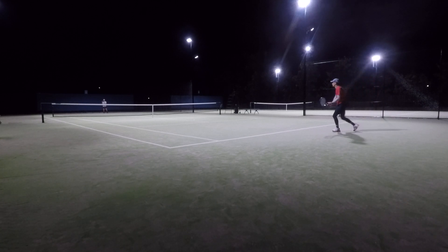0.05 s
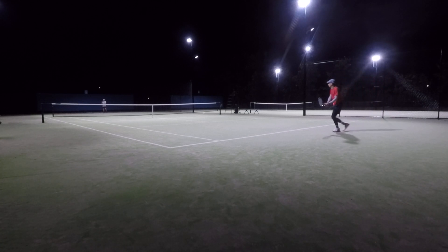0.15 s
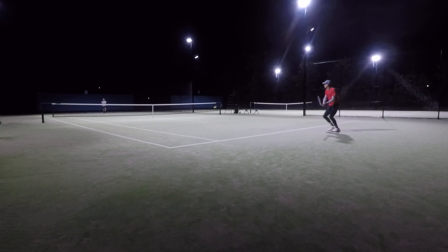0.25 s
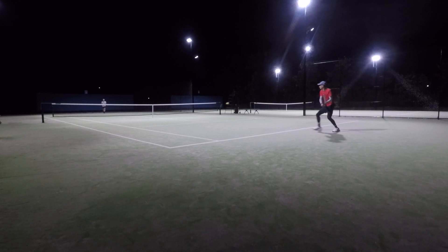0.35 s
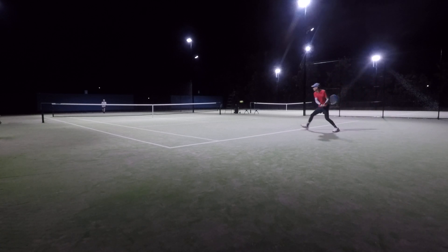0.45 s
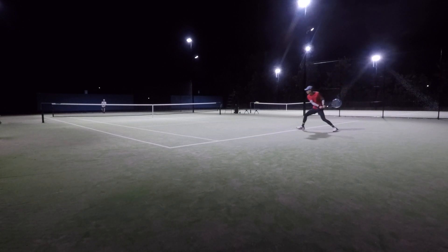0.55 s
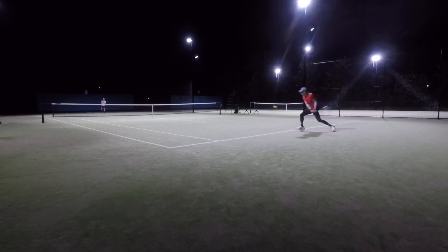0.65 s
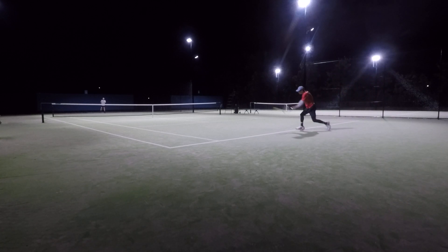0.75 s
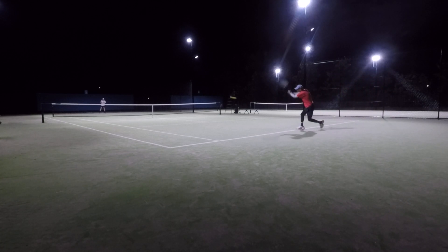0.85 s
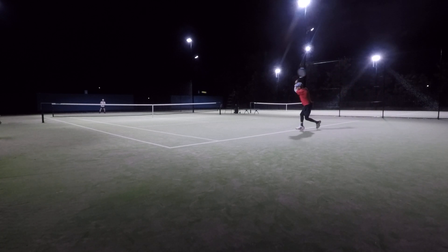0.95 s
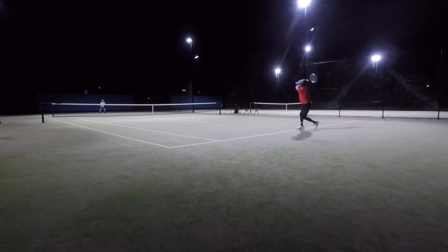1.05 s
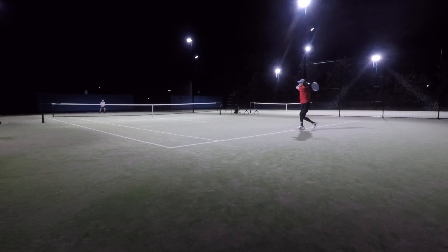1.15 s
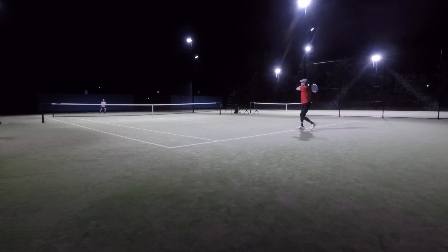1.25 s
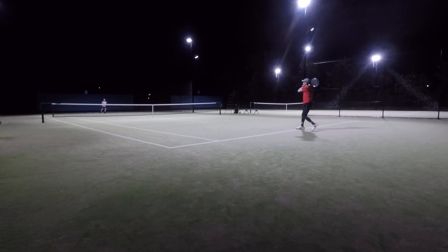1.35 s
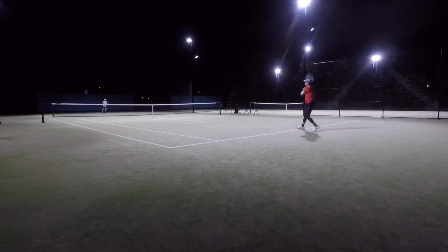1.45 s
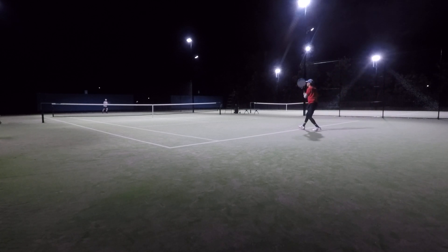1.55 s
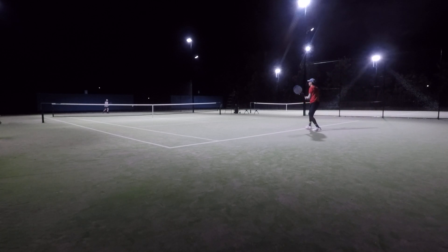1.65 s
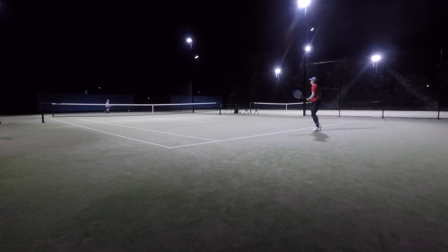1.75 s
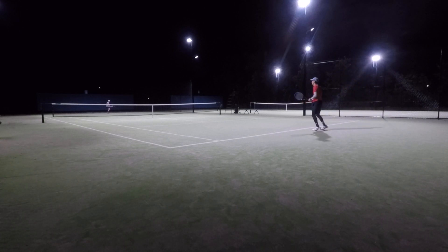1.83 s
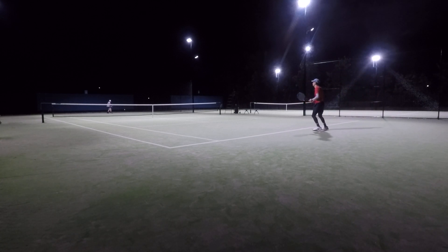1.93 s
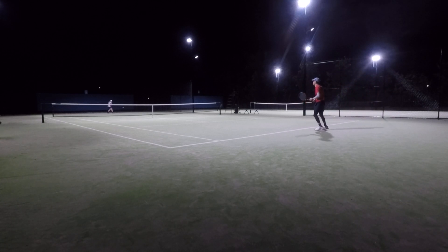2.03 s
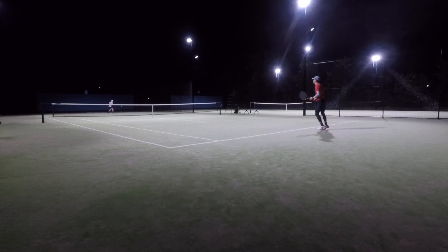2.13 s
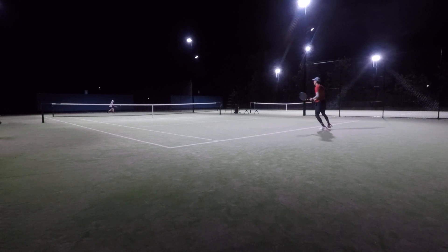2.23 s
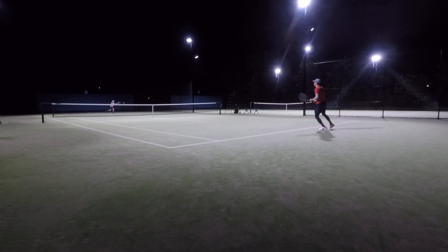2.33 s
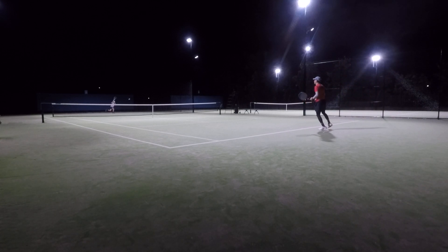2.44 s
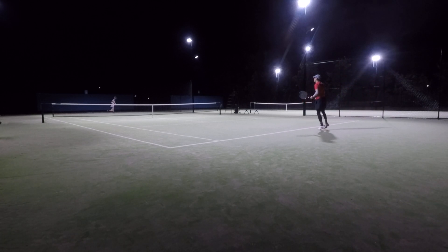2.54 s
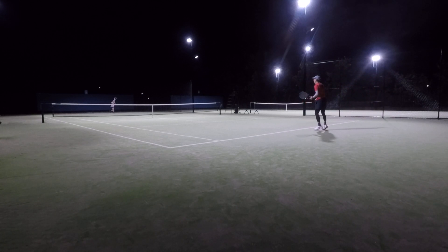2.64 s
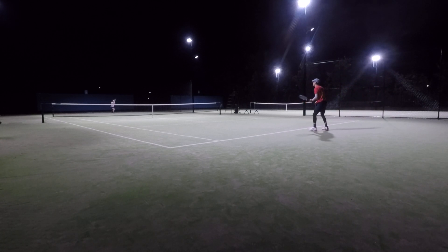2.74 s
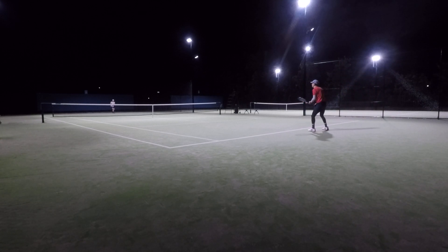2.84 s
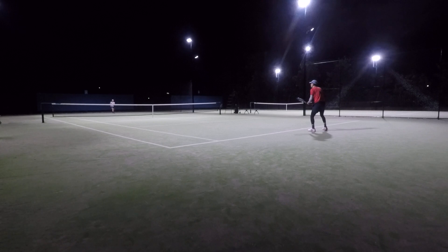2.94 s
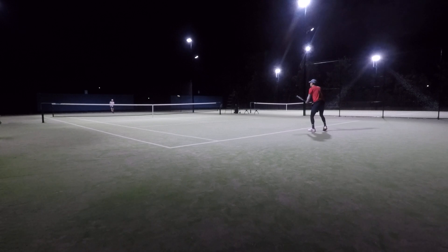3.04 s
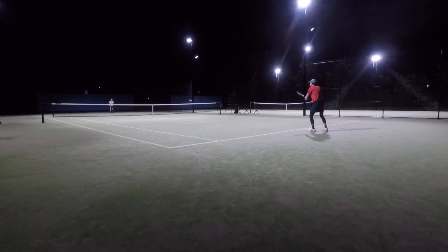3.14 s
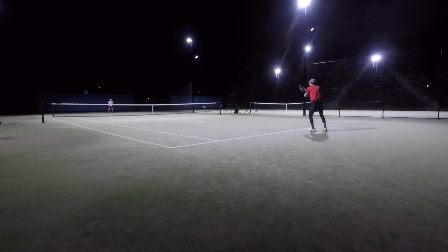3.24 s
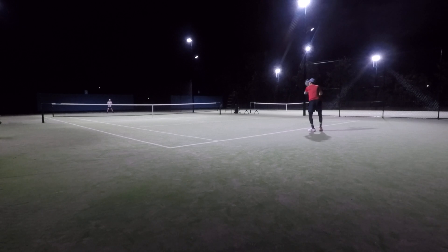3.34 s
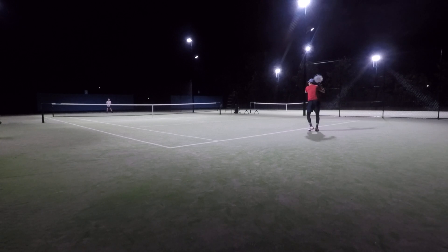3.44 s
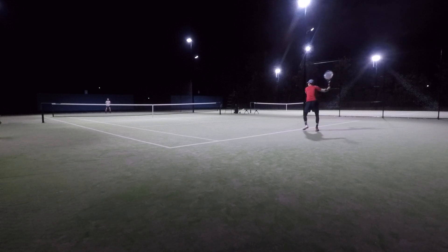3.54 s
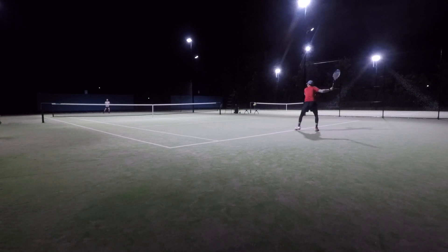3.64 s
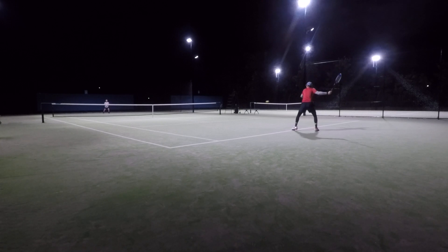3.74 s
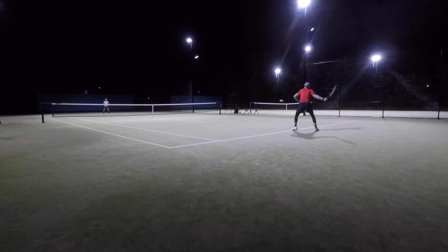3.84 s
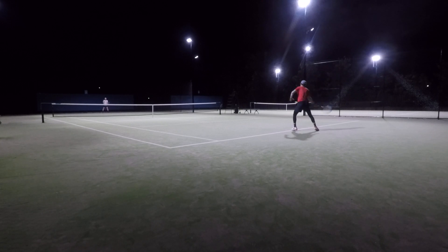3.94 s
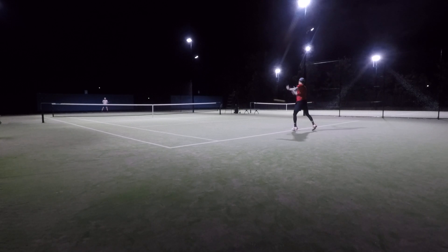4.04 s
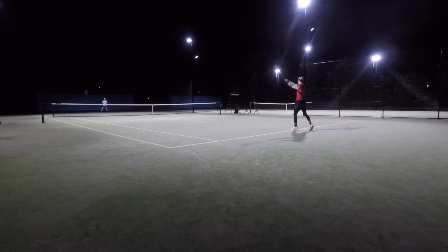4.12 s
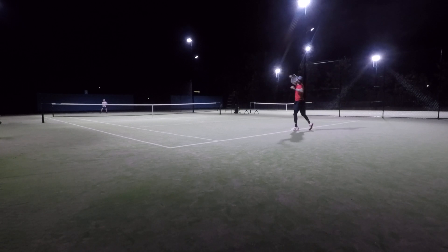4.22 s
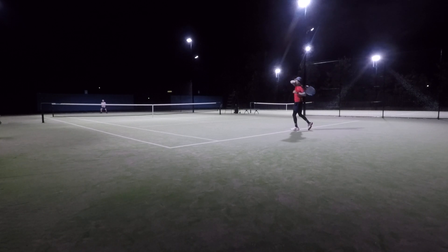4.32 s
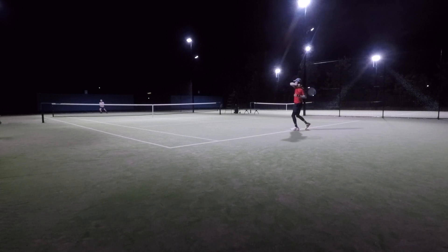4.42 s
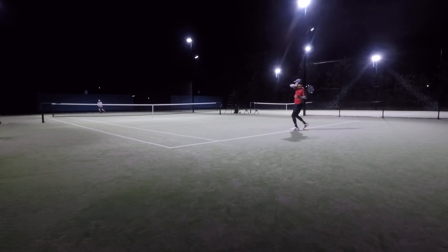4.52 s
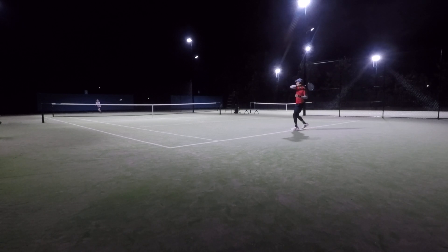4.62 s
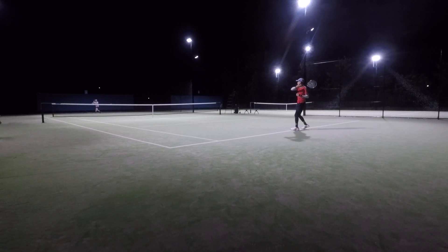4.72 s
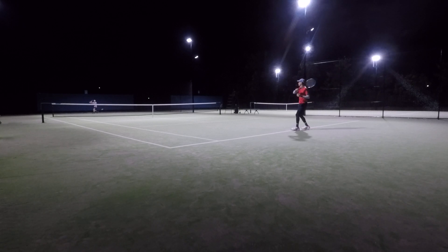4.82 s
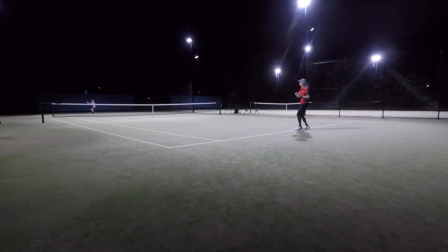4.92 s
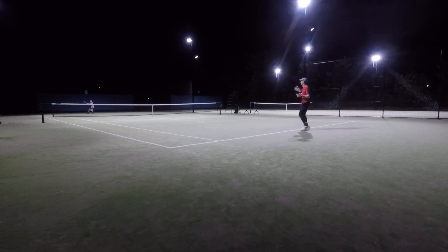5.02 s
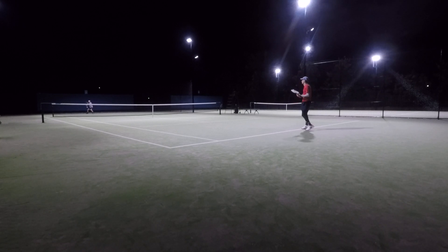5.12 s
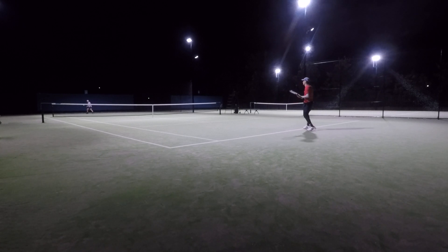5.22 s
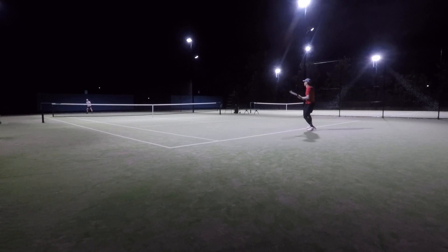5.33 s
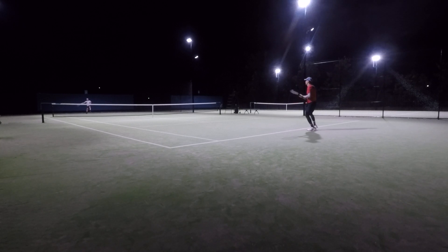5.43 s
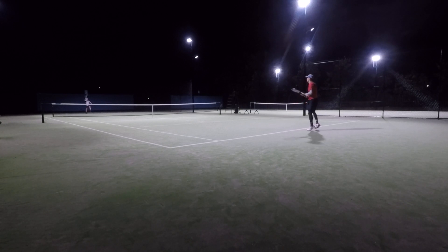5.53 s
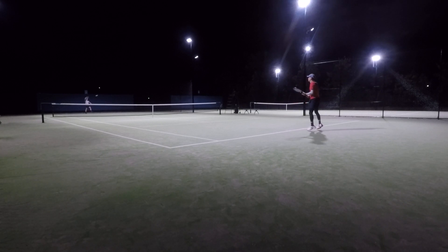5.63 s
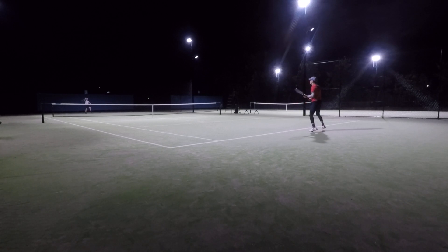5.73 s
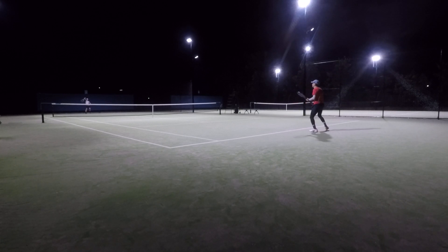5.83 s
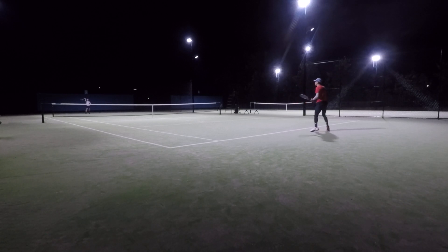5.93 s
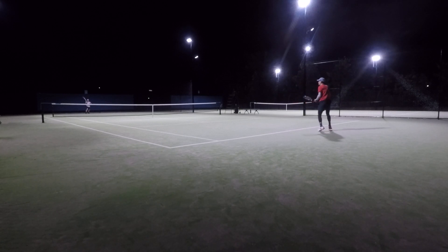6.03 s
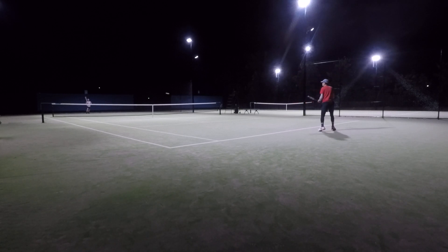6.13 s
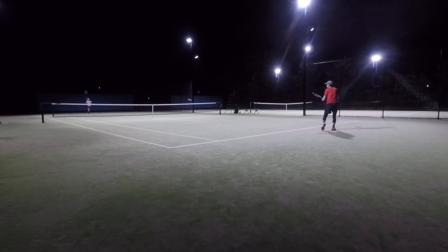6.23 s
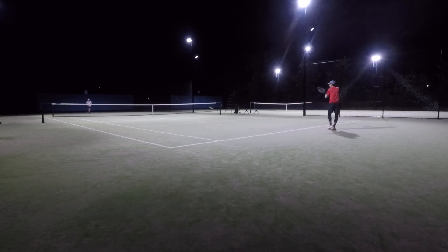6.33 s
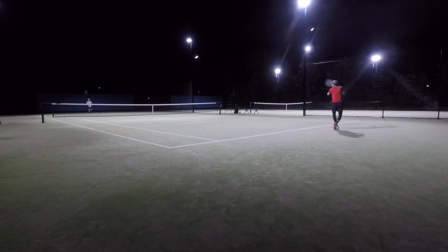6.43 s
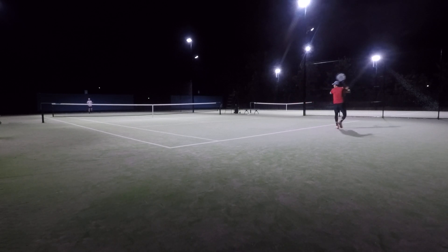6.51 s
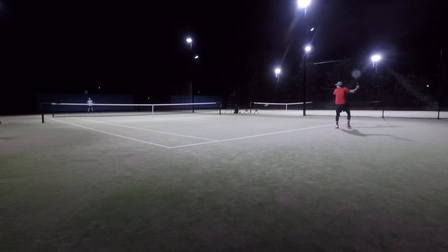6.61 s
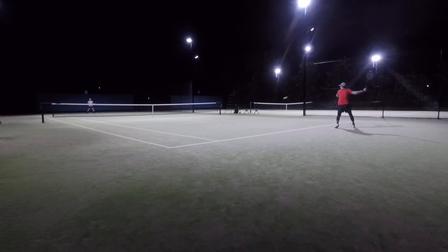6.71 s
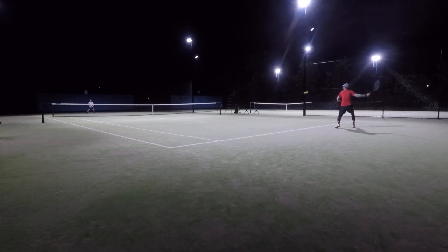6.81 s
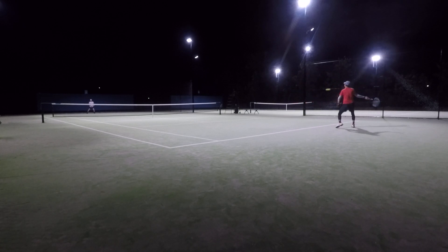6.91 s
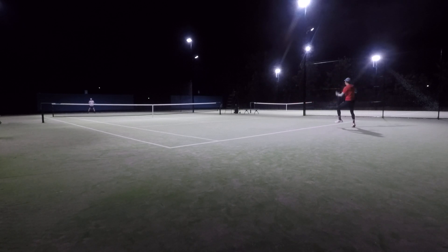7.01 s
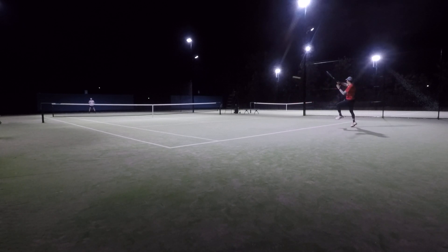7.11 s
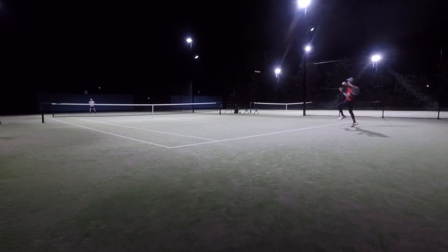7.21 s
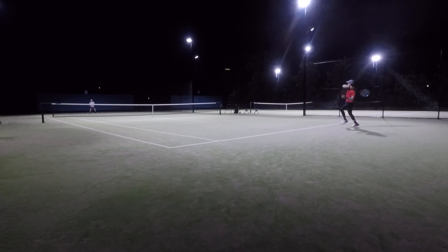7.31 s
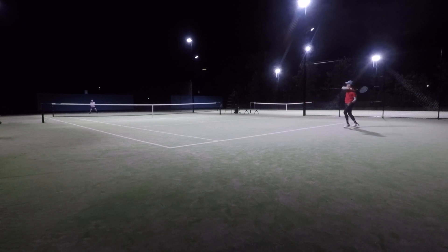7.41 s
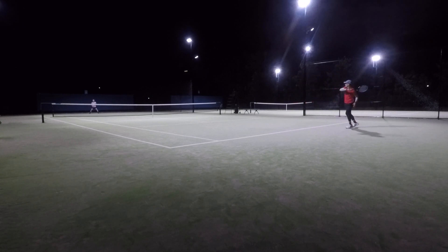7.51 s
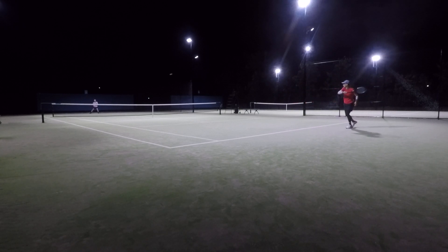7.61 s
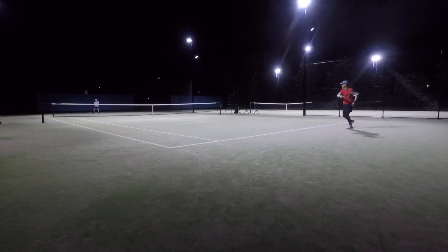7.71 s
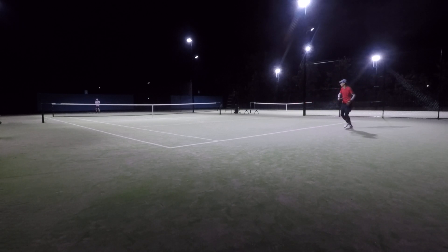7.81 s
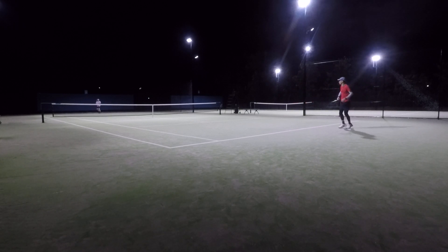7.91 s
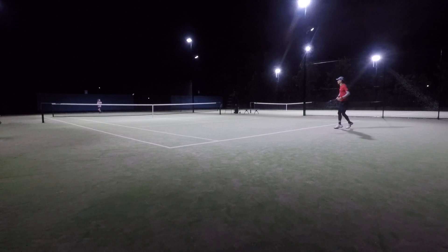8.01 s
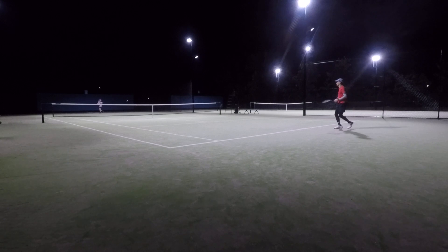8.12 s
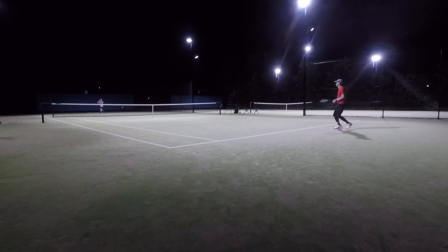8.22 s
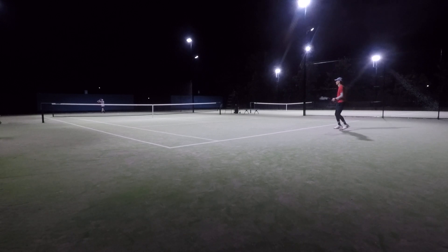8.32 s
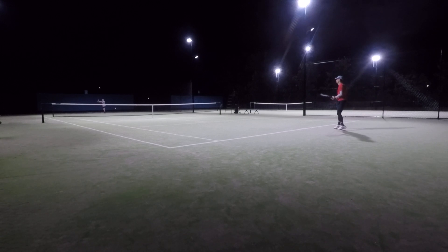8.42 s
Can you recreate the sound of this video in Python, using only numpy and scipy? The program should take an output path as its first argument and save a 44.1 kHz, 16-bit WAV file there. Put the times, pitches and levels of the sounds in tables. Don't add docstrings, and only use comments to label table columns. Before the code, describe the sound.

Outdoor tennis exchange: loud popping ball hits alternate near and far, soles scrape sandy ground, distant engines drone beneath a faint steady hiss.

```python
import sys
import numpy as np
from scipy import signal
from scipy.fft import rfft, irfft
from scipy.io import wavfile
from scipy.ndimage import uniform_filter1d

SR = 44100
rng = np.random.default_rng(int(sys.argv[2]) if len(sys.argv) > 2 else 0)


def convert_level_to_amplitude(level_db):
    exponent = np.asarray(level_db, float) / 20
    return 10 ** exponent


def digitize_waveform(pressure):
    field = np.atleast_2d(pressure).T
    bounded = np.clip(field, -1, 1)
    quanta = np.round(bounded * 32767).astype(np.int16)
    wavfile.write(sys.argv[1], SR, quanta)


N = 373086
MARK_S = 0.01
T = np.arange(22050) / SR - MARK_S


def shade(table, hz):
    pitch_hz, value = np.transpose(table)
    return np.interp(np.log(hz + 1), np.log(pitch_hz), value)


def noise(count, gain):
    spectrum = rfft(rng.standard_normal(count))
    x = irfft(spectrum * gain(np.fft.rfftfreq(count, 1 / SR)), count)
    return x / x.std()


def band(hz, width_hz):
    return lambda f: np.exp(-2 * ((f - hz) / width_hz) ** 2)


def walk(rate_hz):
    hold = int(SR / rate_hz)
    steps = np.repeat(rng.standard_normal(N // hold + 1), hold)
    return uniform_filter1d(uniform_filter1d(steps, hold), hold)[:N]


def add(out, s, x):
    i = int((s - MARK_S) * SR)
    out[i:i + len(x)] += x[:len(out) - i]


def fade(t60, start=0., rise=0.00012):
    t = np.maximum(T - start, 0)
    return (1 - np.exp(-t / rise)) * np.exp(-np.log(1000) * t / t60)


# peak_s, level_db, length_s
GUST_ROWS = [
    (.53, 4, .05),
    (1.85, 7, .06),
    (4.08, 7, .08),
    (6.03, 10, 0.22),
    (8.37, 7, .05),
]


def wind_on_camera():
    t = np.arange(N) / SR
    gust_db = sum(db * np.exp(-4 * ((t - peak_s) / length_s) ** 2) for peak_s, db, length_s in GUST_ROWS)
    flutter = noise(N, lambda f: (1 + (f / 60) ** 2.4) / (1 + (f / 88) ** 20))
    return convert_level_to_amplitude(-71 + gust_db + 1.5 * walk(8)) * flutter


def truck(t):
    abreast_s, rise_s, fall_s = 2.6, 0.48, 1.8
    late = t - abreast_s
    swell = np.exp(-(late / np.where(late < 0, rise_s, fall_s)) ** 2)
    note_hz = 132.3 + 24 * late + 1.17 * walk(5.9)
    note = convert_level_to_amplitude(-47.5 + 3.4 * walk(9)) * np.sqrt(2) * np.sin(2 * np.pi * np.cumsum(note_hz) / SR)
    hum = convert_level_to_amplitude(-43.5) * noise(N, band(164.8, 6.3))
    return swell * (swell * note + hum)


# time_s, level_db
RUMBLE_LEVELS = [(0.0, -46.5), (1.08, -45.5), (1.53, -47.5), (2.66, -42.5), (3.98, -48), (4.19, -44),
                 (5.3, -47.5), (5.68, -40), (5.89, -44.5), (6.83, -45.5), (7.16, -43.5), (7.75, -47),
                 (8.29, -45.5), (8.46, -48.5)]
# pitch_hz, level_db (per Hz)
NIGHT_COLOUR = [(76, -34), (130, 3), (155, 1), (182, 8.5), (690, -16), (1410, -26), (1650, -24.5),
                (3060, -34.5), (3960, -34), (5130, -40.5), (9130, -40), (13300, -50), (15000, -57)]


def town():
    t = np.arange(N) / SR
    rumble_db = np.interp(t, *np.transpose(RUMBLE_LEVELS))
    rumble = np.zeros(N)
    for hz in 160 * 2 ** np.arange(0, 2.1, .5):
        flicker = convert_level_to_amplitude(shade(NIGHT_COLOUR, hz) + 2.37 * walk(9))
        rumble += flicker * np.sqrt(hz) * noise(N, band(hz, hz / 2))
    drone = convert_level_to_amplitude(-50.5 + 2.2 * walk(4)) * noise(N, band(163.7, 29.6))
    hiss = noise(N, lambda f: convert_level_to_amplitude(shade(NIGHT_COLOUR, f)) * f ** 4 / (f ** 4 + 787.0 ** 4))
    follow_db = 0.29 * (rumble_db - rumble_db.mean())
    hiss_level = convert_level_to_amplitude(-52 + follow_db + 0.4 * walk(1.63))
    return convert_level_to_amplitude(rumble_db + 2.5) * rumble / rumble.std() + drone + truck(t) + hiss_level * hiss


# peak_s,
# level_db, pitch_hz, length_s
BROAD_SCUFFS = [(.2, -50, 3400, .04), (.68, -53, 5030, 0.1), (1.847, -61, 6500, .094),
                (3.1, -50.5, 3300, 0.1), (3.74, -63, 6000, 0.022), (4.119, -47, 3050, .082),
                (4.195, -53.5, 3300, 0.072), (5.18, -64, 6950, .08), (5.656, -41.5, 463, 0.083),
                (5.67, -52, 2900, .018), (5.735, -54.5, 3980, .045), (5.79, -43, 378, .04),
                (5.862, -56, 2780, .008), (5.87, -43, 417, 0.032), (5.98, -52, 3200, 0.068),
                (6.055, -59, 7000, 0.033), (6.465, -56.5, 3400, .065), (6.961, -62, 4200, .036),
                (8.061, -58, 4800, 0.046)]
# peak_s, level_db,
# pitch_hz, length_s
NARROW_SCUFFS = [(.204, -53.5, 8700, .035), (.648, -58, 10260, .039), (.677, -43.5, 7360, 0.041),
                 (3.942, -63, 9000, 0.011), (4.06, -44, 3770, 0.029), (4.532, -60, 4300, .01),
                 (5.65, -54, 4400, .028), (6.47, -62, 8550, .058), (3.12, -64, 8500, .05)]


def scuffs():
    out = np.zeros(N)
    for table, width_share in ((BROAD_SCUFFS, 0.99), (NARROW_SCUFFS, 0.37)):
        for s, db, hz, length_s in table:
            grain_db = 3.95 * np.sqrt(40) * uniform_filter1d(rng.standard_normal(len(T)), size=40)
            swell = np.exp(-4 * ((T - .14) / length_s) ** 2)
            sand = noise(len(T), band(hz, width_share * hz))
            add(out, s - .14, convert_level_to_amplitude(db) * swell * convert_level_to_amplitude(grain_db) * sand)
    return out


def push(hz, turns, lean):
    u = hz * T
    return np.cos(2 * np.pi * u) * np.exp(-np.abs((u + lean) / turns) ** 3.5)


# pitch_hz, fall_s (by 60 dB)
SCATTER_FALL = [(150, 0.067), (300, 0.25), (800, 0.51), (2000, 0.43), (5000, 0.23), (12000, 0.6)]


def scatter():
    tail = np.zeros(len(T))
    for hz in 150 * 2 ** np.arange(0, 6.6, .5):
        tail += noise(len(T), band(hz, hz / 2)) * hz ** 0.71 * fade(shade(SCATTER_FALL, hz), .02, .008)
    return tail / np.sqrt(np.sum(tail ** 2))


# start_s, click_db, air_thud_db, tick_db, wall_delay_ms
BALL_BOUNCES = [
    (0.0979, -27.5, -24, -41.5, 14.3),
    (3.433, -26.5, -21, -50, 16),
    (5.0213, -37, -26.5, -63, 16),
    (6.5100, -26, -18.5, -58, 14),
    (8.4230, -36, -26, -55, 15),
]


def bounces():
    out = np.zeros(N)
    for s, click_db, thud_db, tick_db, wall_ms in BALL_BOUNCES:
        click_hz = 1090 + 18 * (click_db + 25)
        thud = np.sin(2 * np.pi * 235 * (T - .0025)) * fade(0.04, 0.0022, 0.00058)
        thud += convert_level_to_amplitude(-20.0) * np.sin(2 * np.pi * 1250 * T) * fade(0.035, 0.00067)
        tick = noise(len(T), band(2300, 3800)) * fade(0.036, -0.00054)
        blow = convert_level_to_amplitude(click_db) * push(click_hz, 0.68, -0.075) + convert_level_to_amplitude(thud_db) * thud + convert_level_to_amplitude(tick_db) * tick
        add(out, s, blow)
        add(out, s + wall_ms / 1000, convert_level_to_amplitude(-2.5) * signal.lfilter([.4], [1, -.6], blow))
        add(out, s - MARK_S, convert_level_to_amplitude(-10) * signal.fftconvolve(blow, scatter()))
    return out


def ring(modes, start=0.0033, pitch=1):
    out = np.zeros(len(T))
    for hz, width_hz, db, t60 in modes:
        rough = 0.72 * noise(len(T), band(pitch * hz, width_hz))
        clean = 0.69 * np.sin(2 * np.pi * (pitch * hz * T + rng.random()))
        out += convert_level_to_amplitude(db) * (rough + clean) * fade(t60 / pitch ** 4, start - 0.022 * (pitch - 1), 0.00047)
    return out


# pitch_hz, level_db
CRACK_COLOUR = [(900, 15.5), (2000, 6.5), (3000, 2.5), (4000, 5.5), (4800, 7.5), (6000, -3), (7200, -9),
                (8700, -5), (11000, -22), (15000, -25)]


def felt_crack(crack_db):
    slap = noise(len(T), lambda f: convert_level_to_amplitude(shade(CRACK_COLOUR, f))) * fade(0.067, -0.001, 0.00014)
    snap = noise(len(T), band(7560, 3850)) * fade(0.019, -0.0039, 0.00084)
    return convert_level_to_amplitude(crack_db) * slap + convert_level_to_amplitude(crack_db + 2) * snap


def whizz(length_s):
    bright = noise(len(T), band(9300, 1800))
    low = noise(len(T), band(8700, 1200))
    share = np.clip(T / length_s, 0, 1)
    return (bright * (1 - share) + low * share) * np.sin(np.pi * share ** 0.5) ** 0.54


HITS = {"near": [(.7751, -5.5, 12.3, -16.5, -20.5), (4.0467, -4.5, 11.6, -21.5, -25.5)],
        "far": [(2.3738, -13.5, 16.5, -23.5, -24), (5.5449, -9, 16.9, -26.5, -24.5)],
        "corner": [(7.0722, -7, 6.3, -22.5, -26)]}
SPOT_ECHOES = {"near": [(21.5, -13.5), (140.5, -23.5), (158, -24)], "far": [(5.08, -11.5), (100.6, -19),
               (48.2, -23)], "corner": [(17.9, -9.5), (140, -20.5), (40.2, -25)]}
BALL_THUMP = {"near": (335, .7, .02), "far": (435, .58, .17), "corner": (310, .6, .08)}
SPOT_LEVELS = {"near": (-3.5, -22.5, -34.5, -12, -58), "far": (2, -40, -22.5, -3, -53),
               "corner": (5.5, -35, -49, -9.5, -53.5)}
SPOT_PITCH = {"near": 1, "far": 1.08, "corner": 1.15}
FLIGHT_S = {"near": 0.52, "far": .25, "corner": 0.37}
# pitch_hz, width_hz, level_db, fall_s (by 60 dB)
STRING_RINGS = [(864, 230, 5.5, 0.1), (994, 220, -9, 0.05), (1462, 120, -7.5, 0.091)]
FRAME_RINGS = [(646, 120, 3.5, 0.052), (240, 89, 11, 0.075)]
RIM_RINGS = [(1664, 710, -0.5, 0.023), (2900, 1500, 2.5, 0.034), (3930, 470, -0.5, 0.033)]


def strikes():
    out = np.zeros(N)
    for spot, s, thump_db, wall_ms, strings_db, crack_db in [(k, *row) for k in HITS for row in HITS[k]]:
        frame_db, knock_db, rim_db, wall_db, whizz_db = SPOT_LEVELS[spot]
        close_echo, *buildings = SPOT_ECHOES[spot]
        crack = felt_crack(crack_db)
        knock = noise(len(T), band(1980, 0.41 * 1980)) * fade(0.073, -0.0021, 0.00072)
        strings = convert_level_to_amplitude(strings_db) * ring(STRING_RINGS, pitch=SPOT_PITCH[spot])
        body = push(*BALL_THUMP[spot]) + convert_level_to_amplitude(knock_db) * knock + strings
        body += convert_level_to_amplitude(strings_db + frame_db) * ring(FRAME_RINGS)
        harder_db = 1.23 * (thump_db + 9)
        body += convert_level_to_amplitude(rim_db + harder_db) * ring(RIM_RINGS, -0.00023)

        court = np.zeros(2 * len(T))
        court[:len(T)] = body + crack
        scattered = body - .5 * strings + crack
        tail = signal.fftconvolve(scattered, scatter())[int(MARK_S * SR):]
        add(court, MARK_S, convert_level_to_amplitude(-12.5) * tail)
        dull = body + signal.lfilter([.5], [1, -.5], crack)
        for ms, db in (close_echo, (wall_ms, wall_db)):
            add(court, MARK_S + ms / 1000, convert_level_to_amplitude(db) * dull)
        add(out, s, convert_level_to_amplitude(thump_db) * court)
        thin = signal.lfilter([2, -1], [1], court)
        for ms, db in buildings:
            add(out, s + ms / 1000, convert_level_to_amplitude(thump_db + db) * thin)

        swing = np.exp(-np.abs(T - .05) / .006) * (T < .05)
        swish = noise(len(T), band(1500, 4500)) * swing
        add(out, s - .053, convert_level_to_amplitude(thump_db - 31) * swish)
        add(out, s + 0.011, convert_level_to_amplitude(thump_db + whizz_db) * whizz(FLIGHT_S[spot]))
    return out


def scene():
    air = town() + scuffs() + bounces() + strikes()
    f = np.fft.rfftfreq(N, 1 / SR)
    low_cut = 1 / np.sqrt(1 + (131 / (f + 1)) ** 68.0)
    return (irfft(rfft(air) * low_cut, N) + wind_on_camera())[None]


def low_pass(x):
    return signal.sosfilt(signal.butter(12, 15740, fs=SR, output="sos"), x)


def record(dry):
    top_cut = signal.ellip(8, .2, 60, 15100, fs=SR, output="sos")
    mix = signal.sosfilt(top_cut, dry)
    return low_pass(mix)


dry = scene()
out = record(dry)
digitize_waveform(out)
```